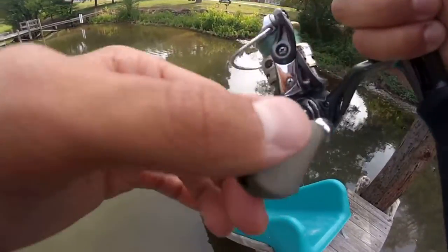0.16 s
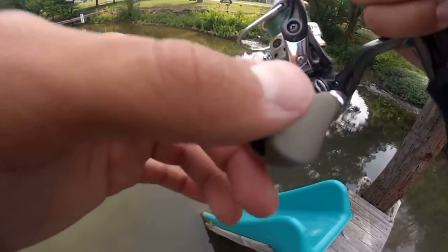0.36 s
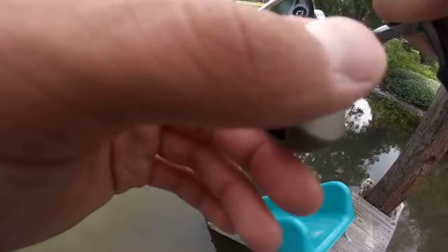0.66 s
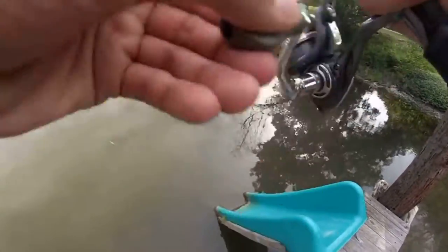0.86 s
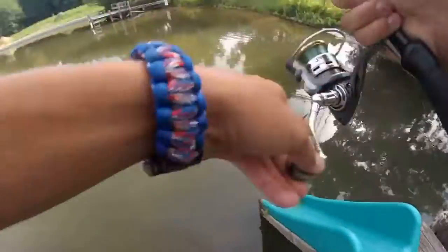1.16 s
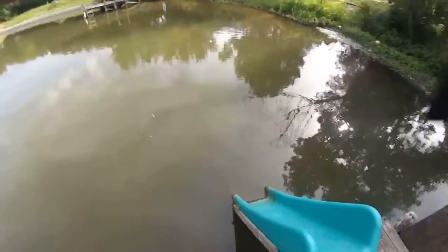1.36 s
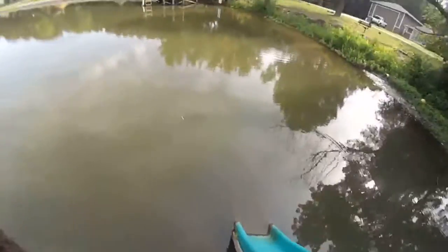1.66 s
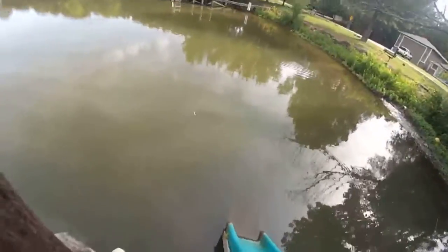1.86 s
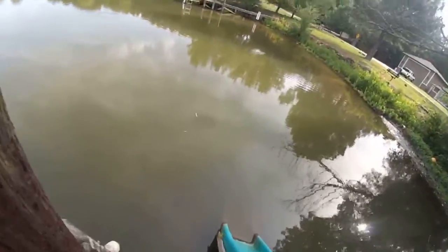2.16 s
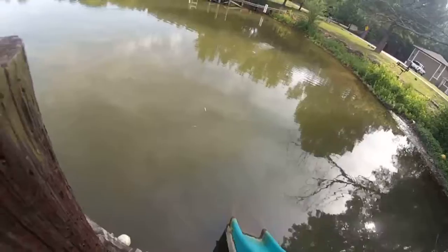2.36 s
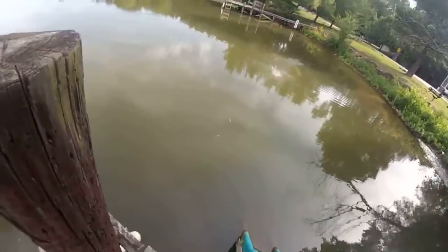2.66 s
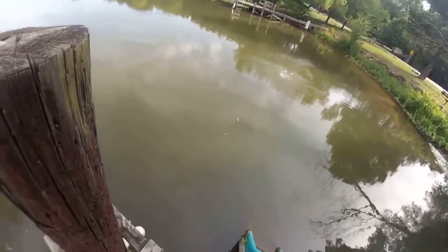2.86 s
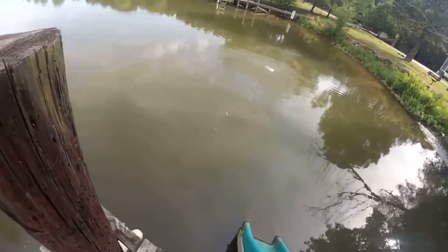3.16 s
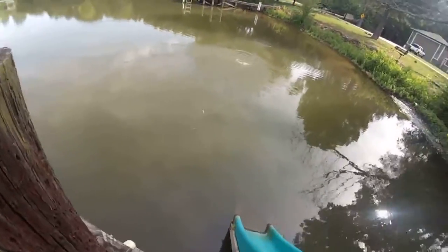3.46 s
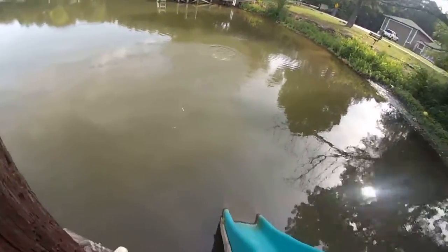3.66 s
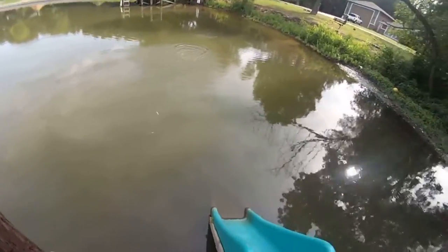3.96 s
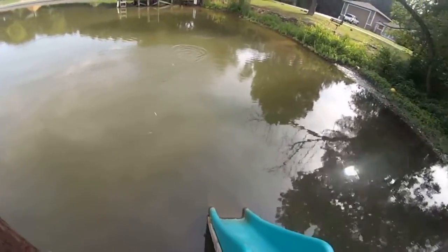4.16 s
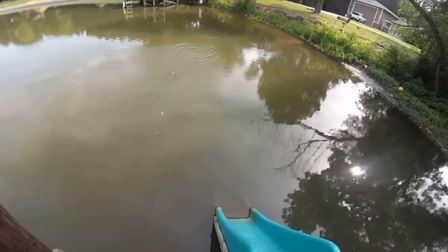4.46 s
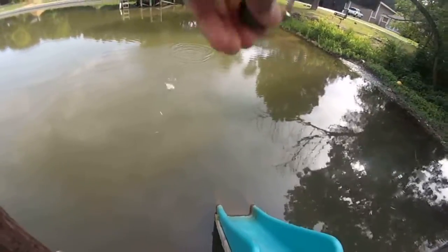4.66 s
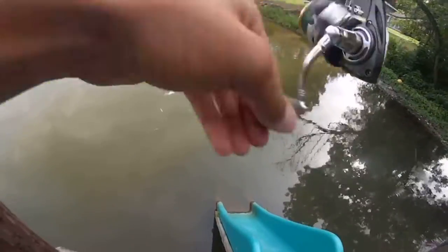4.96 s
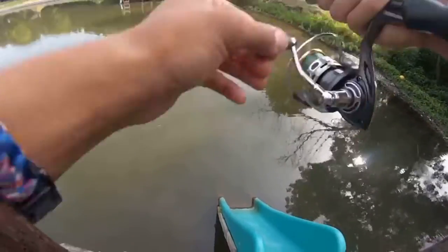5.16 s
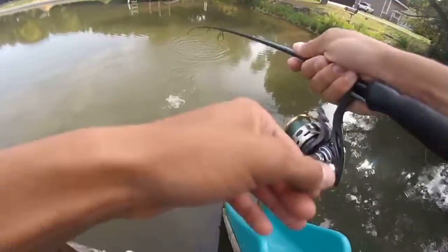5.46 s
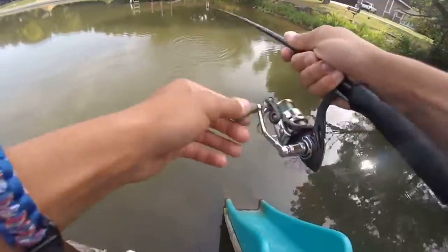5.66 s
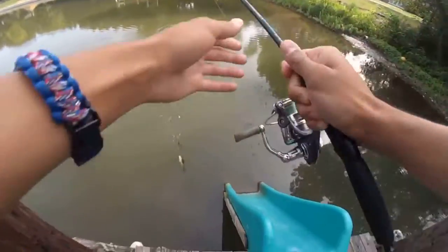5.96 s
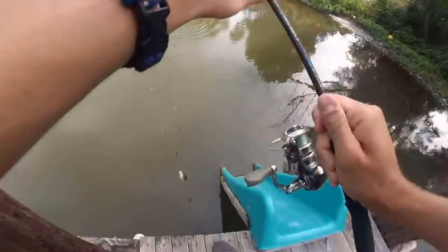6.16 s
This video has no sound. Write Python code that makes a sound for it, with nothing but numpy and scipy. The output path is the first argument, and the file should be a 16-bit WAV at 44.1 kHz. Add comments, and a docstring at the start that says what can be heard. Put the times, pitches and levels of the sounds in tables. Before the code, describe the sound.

Outdoors by a pond, a sharp clack and rasping burst of reel clicks as a rod is swung, then fluttering winding whir, knocks and small watery plops.

```python
"""On a dock at a pond, a spinning rod is swung hard: the line snaps taut and the spool slips, its drag clicker
ticking (noise cracks) and ringing (damped sines). Then the reel is wound in: rotor and roller whir as fluttering
noise bands and noise-driven resonances, parts knock, the lure gurgles and plops as noise and rising sines.
Insects hiss as a narrow noise band over a low outdoor rumble."""
import sys
import numpy as np
from scipy import signal
from scipy.fft import rfft, irfft
from scipy.io import wavfile

SR = 44100
rng = np.random.default_rng(int(sys.argv[2]) if len(sys.argv) > 2 else 0)


def put_to_file(sound):
    """Save the sound as 16-bit audio at rate SR, in the file named by the first command-line argument."""
    columns = np.atleast_2d(sound).T  # one column per channel
    safe = np.clip(columns, -1, 1)
    whole_steps = np.round(safe * 32767)
    wavfile.write(sys.argv[1], SR, whole_steps.astype(np.int16))


N = 278126

# drag clicker spring dropping off a spool tooth: start_s, level_db
TICKS = [(1.411, -21), (1.4215, -26), (1.426, -16), (1.432, -24), (1.435, -21), (1.4385, -19),
         (1.4417, -11.5), (1.448, -15), (1.453, -18), (1.4562, -18.5), (1.463, -17), (1.4673, -19),
         (1.471, -16), (1.476, -17), (1.4827, -20), (1.726, -19.5), (1.7528, -23), (1.7915, -19),
         (1.8223, -17.5), (1.842, -22), (1.8586, -18), (1.8715, -17.5), (1.8826, -15), (1.892, -19),
         (1.901, -20), (1.9091, -20), (1.9169, -16), (1.9241, -18), (1.931, -17), (1.9389, -16.5),
         (1.947, -21), (1.9584, -17), (1.9692, -17), (1.978, -16), (1.9867, -14), (1.9938, -16),
         (2.0017, -18), (2.0097, -15.5), (2.017, -18), (2.026, -15.5), (2.0344, -16.5), (2.042, -17.5),
         (2.0505, -18), (2.0626, -17.5), (2.0922, -19)]
# rush of rod and line in the swing: time_s, level_db
SWING = [(1.25, -73), (1.31, -52.5), (1.355, -53), (1.42, -37), (1.445, -52), (1.48, -43.5), (1.52, -61),
         (1.6, -78.5)]
# whir of the reel being wound: time_s, level_db
WIND = [(1.8, -76), (1.9, -62), (2.06, -54.5), (2.2, -61.5), (2.3, -57.5), (2.42, -59), (2.5, -55.5),
        (2.57, -59.5), (2.64, -52.5), (2.8, -55.5), (4.3, -57.5), (4.6, -57.5), (4.8, -53.5), (5.15, -56),
        (5.27, -61.5), (5.36, -57), (5.63, -57), (5.7, -67), (5.85, -78)]


def from_db(db):
    """Decibels to gain."""
    return 10 ** (np.asarray(db) / 20)


def rms_one(x):
    """Scale to rms 1."""
    return x / np.sqrt(np.mean(x ** 2) + 1e-20)


def in_time(rows):
    """Table columns as curves over all samples."""
    s, *columns = np.transpose(rows)
    return [np.interp(np.arange(N) / SR, s, column) for column in columns]


def sounding(rows):
    """Gate that is open over the span of a table, with 20 ms fades."""
    start_s, end_s = rows[0][0], rows[-1][0]
    return np.interp(np.arange(N) / SR, [start_s - .02, start_s, end_s, end_s + .02], [0, 1, 1, 0])


def colour(x, spectrum):
    """Shape by a relative (pitch_hz, level_db) spectrum, all but silent outside it; mean power gain 1."""
    hz = np.fft.rfftfreq(N, 1 / SR) + 1e-9
    at_hz, level_db = np.transpose(spectrum)
    gain = from_db(np.interp(np.log(hz), np.log(at_hz), level_db, left=-99, right=-99))
    return irfft(rfft(x) * rms_one(gain), N)


def coloured_noise(spectrum):
    """White noise shaped by a spectrum, at rms 1."""
    return rms_one(colour(rng.standard_normal(N), spectrum))


def drift(rate):
    """Slow chance of spread 1, about rate changes a second."""
    r = np.exp(-80 * np.pi * rate / SR)   # computed at every 40th sample
    slow = signal.lfilter([1], [1, -2 * r, r * r], rng.standard_normal(N // 40 + 2002))[2000:]
    return np.interp(np.arange(N) / 40, np.arange(len(slow)), rms_one(slow))


def resonator(hz, t60):
    """Two-pole filter that a unit click sets ringing as a damped sine of height 1."""
    r, w = from_db(-60 / (t60 * SR)), 2 * np.pi * hz / SR
    return [0, np.sin(w)], [1, -2 * r * np.cos(w), r * r]


def ring(clicks, hz, t60):
    """Clicks or noise drive one damped resonance."""
    return signal.lfilter(*resonator(hz, t60), clicks + 1e-18)


def strike(times, strength_db, modes, spread_db, keep):
    """Every blow strikes every mode with a strength of its own and damps what still rings to the share keep."""
    edges, out = np.append((times * SR).astype(int), N), np.zeros(N)
    chance = rng.standard_normal((len(times), len(modes)))
    blows_db = strength_db.reshape(len(times), -1) + spread_db * chance
    for k, (hz, level_db, t60) in enumerate(modes):
        b, a = resonator(hz, t60)
        state = np.zeros(2)
        for start, end, blow in zip(edges, edges[1:], from_db(level_db + blows_db[:, k])):
            click = blow * (np.arange(end - start) == 0) + 1e-18
            part, state = signal.lfilter(b, a, click, zi=keep * state)
            out[start:end] += (-1) ** k * part   # neighbouring modes start in opposite directions
    return out


def band(x, low_hz, high_hz):
    """Gentle band-pass."""
    sos = signal.butter(1, [low_hz, min(high_hz, .45 * SR)], "band", fs=SR, output="sos")
    return signal.sosfilt(sos, x)


def swell(s, peak_db, rise_db_per_s, fall_db_per_s, hold_s=0):
    """Gain that climbs to a peak at s, holds and falls."""
    t = np.arange(N) / SR - s
    return from_db(peak_db + rise_db_per_s * np.minimum(t, 0) - fall_db_per_s * np.maximum(t - hold_s, 0))


def drag_clicker(crack_t60=0.0073, crack_db=-3.5, jerk_db=-4.5):
    """Each tick is a bright crack of a few ms, then spring and spool ring on."""
    # colour of the crack: pitch_hz, level_db (per Hz)
    crack_colour = [(710, -49.5), (1200, -27), (1630, -18.5), (1860, -20.5), (2200, -13), (4160, -13),
                    (5660, -2), (6830, -0.5), (9500, 0.5), (12100, -2), (14800, 0.5), (15600, 11),
                    (16600, -2)]
    # modes of the spring: pitch_hz, level_db, t60_s
    spring_modes = [(5716, -17, 0.069), (5739, -15, 0.063), (14900, -5, 0.014), (14150, -11.5, 0.0085),
                    (2420, -36, 0.094), (2650, -34, 0.026)]
    # modes of spool and spring that ring on: pitch_hz, level_db, t60_s
    spool_modes = [(7220, -29, 0.53), (10890, -32, 0.078), (11210, -39.5, 0.66)]
    # the jerk strikes the spool's modes harder, the upper ones most: extra level_db of each mode
    jerk_ring_db = [7, 8.5, 10.5]
    spring_ring_db, spool_ring_db = -5.5, -4   # how hard a tick sets each ringing
    free_after_s, free_ring_db = .025, 3   # with no next tooth this soon the spool rings louder

    s, tick_db = np.transpose(TICKS)
    in_jerk = s < SWING[-1][0]
    length = 800   # samples
    cracks = rng.standard_normal((len(s), length)) * from_db(-60 * np.arange(length) / (crack_t60 * SR))
    cracks[:, 0] += 3.5   # the spring lands with one sharp step
    crack_db = crack_db + jerk_db * in_jerk   # during the jerk the spring skims the teeth
    onset_rms = np.sqrt(np.mean(cracks[:, :40] ** 2, axis=1, keepdims=True))
    cracks *= from_db(tick_db + crack_db)[:, None] / onset_rms
    train = np.zeros(N)
    np.add.at(train, (s * SR).astype(int)[:, None] + np.arange(length), cracks)

    spring = strike(s, tick_db + spring_ring_db, spring_modes, 5.4, keep=0.7)
    spool_db = tick_db + spool_ring_db + free_ring_db * (np.diff(s, append=N) > free_after_s)
    spool_blows_db = spool_db[:, None] + np.outer(in_jerk, jerk_ring_db)
    spool = strike(s, spool_blows_db, spool_modes, 2.0, keep=0.64)
    return colour(train, crack_colour) + spring + spool


def swing():
    """Rod and line cut the air in a ragged rush, the spool hisses as it slips, the jerk buffets the microphone."""
    # colour of the rush: pitch_hz, level_db (per Hz)
    rush_colour = [(250, -28), (480, 2), (900, -16.5), (1500, -6.5), (2300, 3.5), (3200, -9), (4600, -5.5),
                   (8000, -9.5), (13000, -15)]
    # spool slipping against the drag: full_from_s, hold_s, hiss level_db
    slips = [(1.413, 0.058, -35.5), (1.5, 0.05, -64), (1.9, .16, -70)]
    # colour of the slip hiss: pitch_hz, level_db (per Hz)
    slip_colour = [(3000, -16), (4600, 5), (5800, 1), (8000, -2), (13000, -9), (15250, 8), (15700, -12.5),
                   (16200, -39)]
    # buffets of air: peak_s, level_db
    gust_rows = [(1.31, -49.5), (1.37, -42.5), (1.405, -44), (1.436, -39), (1.5, -55), (1.606, -48)]

    rush = from_db(in_time(SWING)[0] + 6.6 * drift(100)) * coloured_noise(rush_colour)

    teeth = np.isin(np.arange(N), (np.array(TICKS)[:, 0] * SR).astype(int))
    pulsing = 0.56 + signal.lfilter([1], [1, -.993], teeth)   # the hiss jumps at every tooth
    slipping = sum(swell(s, db, rise_db_per_s=600, fall_db_per_s=2000, hold_s=hold) for s, hold, db in slips)
    slip = pulsing * slipping * from_db(1.3 * drift(147)) * coloured_noise(slip_colour)

    air = coloured_noise([(12, 4.0), (35, 4.5), (70, -2), (110, 1.0), (250, -19.5), (600, -20.0)])
    gusts = sum(swell(s, db, rise_db_per_s=696, fall_db_per_s=799.5, hold_s=0.018) for s, db in gust_rows)
    return sounding(SWING) * rush + slip + gusts * air


def patchy_noise(swell_db, patchy_db, grit_per_s, tilt_db):
    """Narrow bands of noise that flutter each on its own and share a swell; grains flare in single bands."""
    edges_hz, out, white = np.geomspace(900, 15400, 23), 0, rng.standard_normal((2, N))
    for k, (low_hz, high_hz) in enumerate(zip(edges_hz, edges_hz[1:])):
        grit = (rng.random(N) < grit_per_s / SR) * from_db(2.6 * np.minimum(rng.exponential(1, N), 3))
        flare = 1 + 1.51 * signal.lfilter([1], [1, -.99], grit)
        sos = signal.butter(2, [low_hz, high_hz], "band", fs=SR, output="sos")
        part = signal.sosfilt(sos, white[k % 2] * flare)   # neighbours use different noise
        flutter_db = patchy_db * drift(49.8) + 0.53 * drift(5.74)
        out = out + part * from_db(flutter_db + tilt_db * np.log2(low_hz / 2500))
    return out * from_db(swell_db)


def reel(roller_throb_db=3.5):
    """Gears whir and line sizzles in patches; the roller rings, swelling once a rotor turn."""
    # speed of the rotor: time_s, turns_per_s
    rotor_speed = [(2.3, 20), (3.8, 17.4), (4.0, 15.5), (4.3, 17.9), (4.9, 15.42), (5.6, 12.5)]
    # pull on the line, as gain of roller ring and line sizzle over the whir: time_s, level_db
    line_pull = [(2.0, 0), (2.64, -10), (2.85, -2), (3.4, 1), (4.25, 6), (5.0, 1), (5.4, 0), (5.65, -10)]
    # tilt of the whir and sizzle: time_s, tilt_db_per_octave
    brightness = [(2.0, 0), (3.7, 0.5), (4.2, -1), (4.7, 0.5), (5.2, -3), (5.7, -1.5)]
    # colour of the whir: pitch_hz, level_db (per Hz)
    whir_colour = [(900, -15.5), (1500, -7.5), (2400, -3), (3300, -2), (4200, -2), (5100, -4), (6800, -2.5),
                   (8200, -4.5), (9200, -7.5), (10800, -4), (12500, -8.5), (13800, -3), (15200, -3.5),
                   (15400, -38)]
    # colour of wet line through the guides: pitch_hz, level_db (per Hz)
    sizzle_colour = [(4800, -8), (5600, -2), (7200, -3), (8300, -4), (9500, -7), (15200, -28)]
    roller_hz, roller_width_hz = 4540, 235
    roller_low_hz, roller_low_db = 2420, -11   # a fainter, lower ring of the roller
    sizzle_db = -3.5   # relative to whir and pull

    (whir_db,), (pull_db,), (tilt_db,) = in_time(WIND), in_time(line_pull), in_time(brightness)
    turn = np.cos(2 * np.pi * np.cumsum(in_time(rotor_speed)[0]) / SR + 0.82 * drift(7.2))
    hiss = patchy_noise(1.5 * drift(25), patchy_db=3.0, grit_per_s=30., tilt_db=tilt_db)
    whir = from_db(3) * colour(hiss, whir_colour)

    rub = rng.standard_normal(N)
    high_ring = rms_one(ring(rub, roller_hz, 3.1 / roller_width_hz))
    low_ring = rms_one(ring(rub, roller_low_hz, 2.8 / roller_width_hz))
    roller_db = pull_db - 2.0 + roller_throb_db * turn + 3.53 * drift(63)
    roller = (high_ring + from_db(roller_low_db) * low_ring) * from_db(roller_db)

    sizzle = from_db(whir_db + pull_db + sizzle_db) * rms_one(colour(hiss, sizzle_colour))
    # cranking shakes the microphone
    sway_noise = coloured_noise([(10, -16), (30, -0.5), (60, -8.0), (150, -17.0)])
    sway = from_db(-7.5 + 1.8 * drift(7.2)) * sway_noise
    return sounding(WIND) * (from_db(whir_db) * (whir + roller + sway) + sizzle)


def faint_knocks(count=40):
    """Knock rows (start_s, level_db, centre_hz) at chance times while the hands work, louder with the whir."""
    first_s, last_s = .75, 6.25
    top_db, range_db = -50, 5.5   # top level before the whir adds to it, and random range below
    when, size, pitch = rng.random((count, 3)).T
    s = first_s + when * (last_s - first_s)
    busy_db = np.interp(s, *np.transpose(WIND)) - WIND[0][1]
    return np.transpose([s, top_db + busy_db - range_db * size, 2200 * 3.2 ** pitch])


def knocks(width=1.306, broad_db=-12, edge=3.9, crack_t60=0.0081):
    """A short noisy crack around its own centre, a broad edge, a thud and the body's modes."""
    # knocks of line, bail and handle: start_s, level_db, centre_hz
    knock_rows = [(0.7111, -37, 6240), (0.827, -52, 6440), (0.869, -55, 9000), (1.0811, -46, 4040),
                  (1.1979, -36.5, 6340), (1.2222, -43, 2320), (1.2446, -38, 7010), (1.2526, -35, 2370),
                  (1.2828, -43, 2240), (1.3054, -16.5, 4300), (1.3298, -27, 7340), (1.346, -49, 4710),
                  (1.3558, -32, 4300), (1.378, -41, 2060), (1.389, -30, 8000), (1.3996, -9, 6350),
                  (1.4006, -7.5, 4900), (1.5044, -33.5, 7000), (1.5281, -32, 7300), (1.534, -46, 11000),
                  (1.54, -39, 11000), (1.59, -41, 4600), (1.613, -42.5, 2330), (1.618, -40.5, 6600),
                  (1.8272, -21.5, 4260), (2.2213, -32.5, 6250), (2.414, -29, 6450), (2.4312, -31, 7740),
                  (2.458, -27, 2650), (2.466, -19, 7300), (2.4782, -25, 6800), (2.4914, -40, 4620),
                  (2.592, -33.5, 9250), (2.6155, -26, 6700), (2.627, -25, 6300), (2.6478, -27.5, 6900),
                  (2.7378, -30.5, 6700), (2.799, -37, 6420), (3.039, -21, 6600), (3.3066, -23.5, 7200),
                  (3.3964, -31, 4750), (3.4437, -43, 14900), (3.5811, -21.5, 6360), (3.683, -26.5, 5680),
                  (3.8684, -35, 6600), (3.901, -29, 4670), (3.9796, -19, 3920), (4.1672, -31, 2120),
                  (4.359, -33, 1870), (4.7753, -13, 6200), (4.8403, -26, 4520), (4.8891, -30.5, 4630),
                  (5.001, -26, 6760), (5.3386, -36, 4700), (5.4933, -28, 5400), (5.6235, -42.5, 6600),
                  (5.64, -39.5, 1780), (5.7487, -31.5, 2470), (5.7624, -43.5, 2480), (5.818, -47.5, 4500),
                  (5.974, -49.5, 6000)]
    # modes of the reel body struck by each knock: pitch_hz, level_db, t60_s
    body_modes = [(2450, -9, 0.0047), (4630, -10, 0.0043), (470, -34.5, 0.058)]
    thud_db, thud_follows = -37.5, 0.49   # level for a 0 dB knock, share of the knock's dB that it follows

    length = 2000   # samples
    out, t = np.zeros(N + length), np.arange(length) / SR
    rows = np.array(sorted(knock_rows + [tuple(row) for row in faint_knocks()]))
    for (s, level_db, hz), noise in zip(rows, rng.standard_normal((len(rows), length))):
        burst = noise * from_db(-60 * t / crack_t60)
        burst[0] += edge   # the first contact is one sharp step
        centred = band(band(burst, hz / width, hz * width), hz / width, hz * width)
        broad = band(band(burst, 1000, 12000), 300, 16000)
        crack = centred + from_db(broad_db) * broad
        thud = band(band(burst, 300, 900), 300, 900)
        sound = from_db(level_db) * crack / np.abs(crack).max()
        sound += from_db(thud_db + thud_follows * level_db) * thud / np.abs(thud).max()
        start = int(s * SR)
        out[start:start + length] += sound
    body = strike(rows[:, 0], rows[:, 1], body_modes, 1.0, keep=0.6)
    return colour(out[:N], [(60, 2.5), (15200, 4), (15600, -5), (16800, -26)]) + body


def bumps():
    """Dull bumps of rod and handle against hand and body: damped rings, softened at the start."""
    # start_s, level_db, pitch_hz, t60_s
    bump_rows = [(1.401, -23.5, 1740, 0.013), (1.402, -26.5, 470, 0.03), (1.59, -47, 2400, 0.013),
                 (1.826, -41, 141, 0.066), (1.909, -45, 298.4, 0.064), (2.0, -36, 1530, 0.015),
                 (2.355, -48.5, 442, 0.056), (2.54, -43, 1610, .03), (2.692, -43.5, 790, 0.045),
                 (2.71, -44, 1750, 0.035), (5.12, -33, 137, 0.064), (5.345, -37, 2890, 0.018),
                 (5.746, -49.5, 433, 0.0416)]
    out = 0
    for s, level_db, hz, t60 in bump_rows:
        click = from_db(level_db + 0.5) * (np.arange(N) == int(s * SR))
        out = out + band(ring(click, hz, t60), hz / 2, hz * 2)
    return out


def lure_wash(per_s=160., cycles=28.0):
    """The dragged lure stirs the water: a dull wash and small bubbles at random pitches."""
    # water stirred by the lure: time_s, level_db
    water = [(1.8, -67), (1.9, -59.5), (2.3, -71.5), (2.64, -56.5), (2.8, -61), (2.98, -52), (3.35, -66.5),
             (4.6, -68), (5.15, -54.5), (5.27, -74), (5.5, -54.5), (5.63, -64.5), (5.85, -85)]
    wash = coloured_noise([(120, 1), (300, -2.0), (600, 0), (1100, -5), (2000, -31.5)])
    born = (rng.random(N) < per_s / SR) * from_db(4.1 * np.minimum(rng.exponential(1, N), 3))
    pitches_hz = np.geomspace(260, 1800, 14)
    dealt = rng.integers(0, 14, N)   # which pitch each bubble gets
    small = sum(ring(born * (dealt == k), hz, cycles / hz) for k, hz in enumerate(pitches_hz))
    small = rms_one(band(small, 300, 1600))
    mix = wash * from_db(-5.5 + 3.8 * drift(39)) + from_db(-7.0) * small
    return sounding(water) * from_db(in_time(water)[0]) * mix


def bubbles(wobble=0.05, slap_db=-12):
    """A bubble rings as a dying sine whose pitch climbs unsteadily; a short slap of water starts it."""
    # bubbles at the lure: start_s, level_db, start_hz, rise_octaves_per_s, t60_s
    bubble_rows = [(2.794, -42, 354, 2.1, 0.036), (2.946, -46.5, 230, 22, 0.18),
                   (3.009, -42, 375, 1.1, 0.075), (3.157, -39, 397, 1.1, 0.02), (4.91, -45, 860, 21, 0.066),
                   (5.033, -29.5, 840, 2.6, 0.024), (5.033, -36.5, 404, 15, 0.13),
                   (5.41, -27.5, 651.4, 4.0, 0.061), (5.482, -43.5, 525, 1.18, 0.1),
                   (5.56, -49.5, 424, 8.4, 0.169)]
    out, t = np.zeros(N), np.arange(int(.15 * SR)) / SR
    unsteady, slap = 1 + wobble * drift(107), band(rng.standard_normal(N), 300, 2400)
    for s, level_db, start_hz, rise, t60 in bubble_rows:
        span = slice(int(s * SR), int(s * SR) + len(t))
        hz = start_hz * unsteady[span] * 2 ** (rise * np.minimum(t, .05))   # the climb ends after 50 ms
        envelope = from_db(-60 * t / t60) * (1 - np.exp(-t / .0015))
        tone = envelope * np.sin(2 * np.pi * np.cumsum(hz) / SR)
        out[span] += from_db(level_db) * (tone + from_db(slap_db - 60 * t / 0.16) * slap[span])
    return out


def surroundings():
    """Rumble and hiss of the open air, the insect band, fingers sliding on reel and rod: coloured noises."""
    # colour of the open air: pitch_hz, level_db (per Hz)
    air_colour = [(15, -8), (30, -10), (55, -1.5), (100, -2), (160, -9.5), (400, -16.5), (1000, -23.5),
                  (3000, -27.5), (5500, -31), (12800, -34), (13100, -53.5)]
    # colour of the insect band: pitch_hz, level_db (per Hz)
    insect_colour = [(5700, -20), (5950, -1.5), (6500, 3), (6950, 0), (7200, -25)]
    # sliding fingers: time_s, level_db
    rustle = [(.65, -79), (.9, -69.5), (1.15, -68), (1.2, -96), (5.9, -91), (6.0, -63), (6.1, -67.5),
              (6.31, -71.5)]
    air_db, insects_db = -61, -71
    air = from_db(air_db + 0.3 * drift(1.9)) * coloured_noise(air_colour)
    insects = from_db(insects_db + 0.74 * drift(18)) * coloured_noise(insect_colour)
    rub = coloured_noise([(400, 5.5), (1500, 0), (4000, -6.5), (12800, -12.5)])
    fingers = sounding(rustle) * from_db(in_time(rustle)[0] + 4.0 * drift(40)) * rub
    return air + insects + fingers


def scene():
    """All sources summed to one channel."""
    handling = drag_clicker() + swing() + reel() + knocks() + bumps()
    water = lure_wash() + bubbles()
    return (handling + water + surroundings())[None]


def record(dry):
    """The top is cut steeply, 70 dB down from 16.8 kHz up."""
    return signal.sosfilt(signal.cheby2(12, 70, 16800, fs=SR, output="sos"), dry)


dry = scene()
out = record(dry)
put_to_file(out)
```